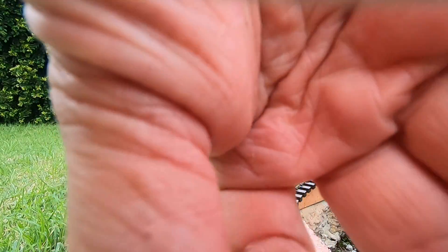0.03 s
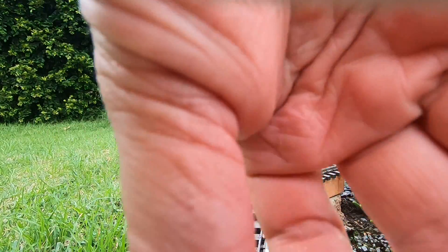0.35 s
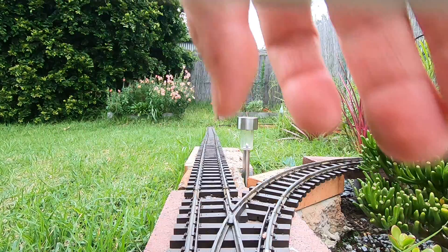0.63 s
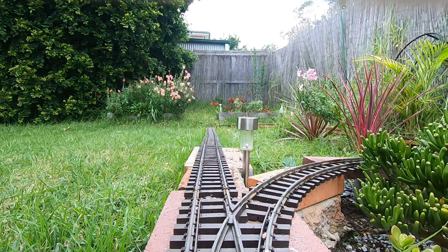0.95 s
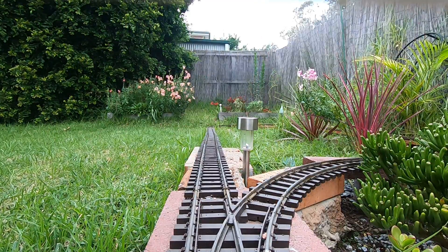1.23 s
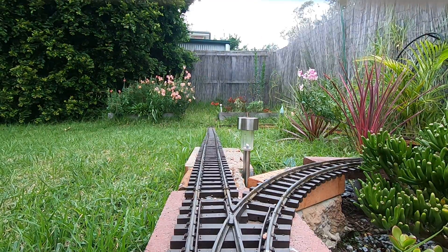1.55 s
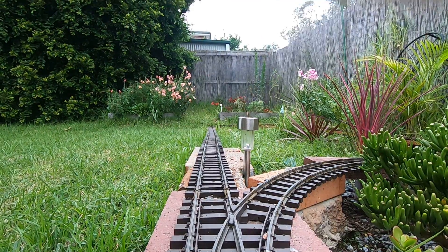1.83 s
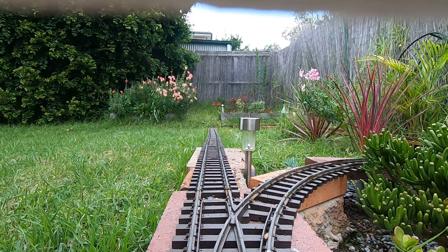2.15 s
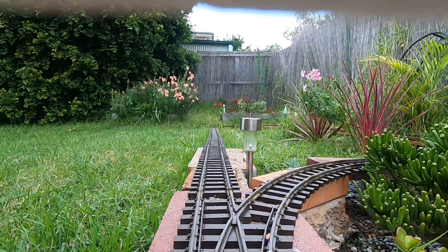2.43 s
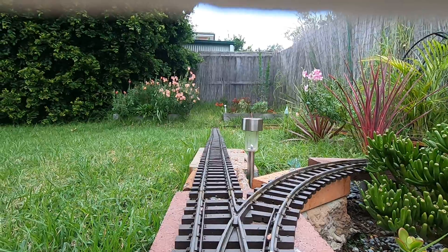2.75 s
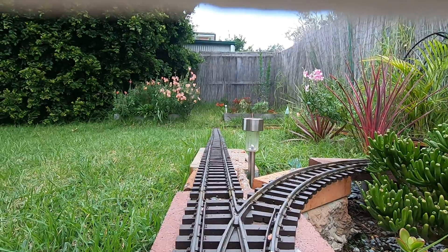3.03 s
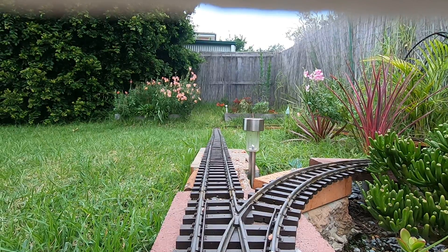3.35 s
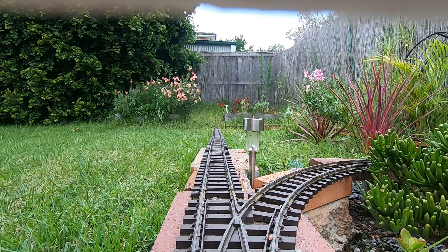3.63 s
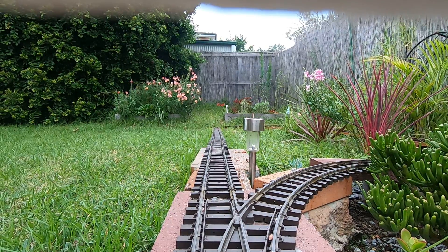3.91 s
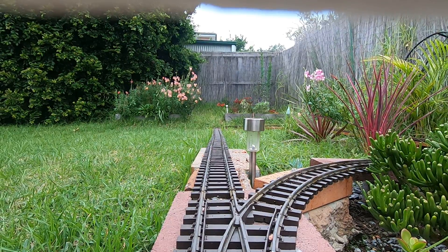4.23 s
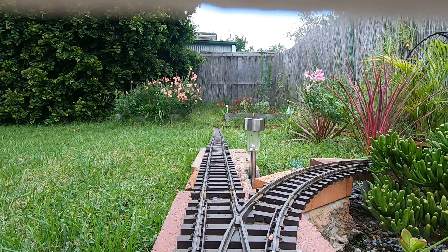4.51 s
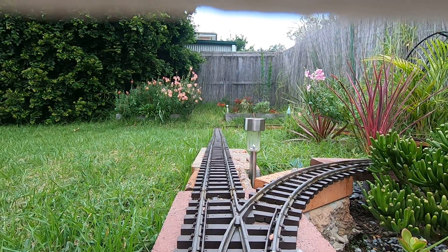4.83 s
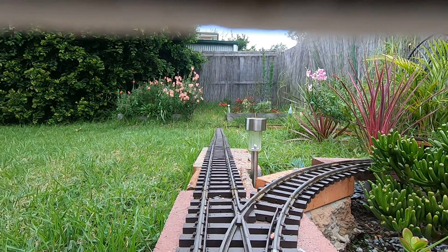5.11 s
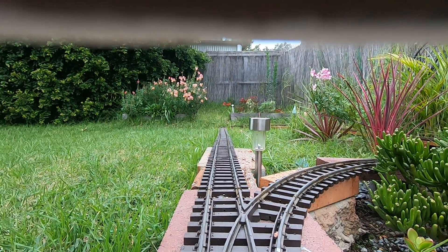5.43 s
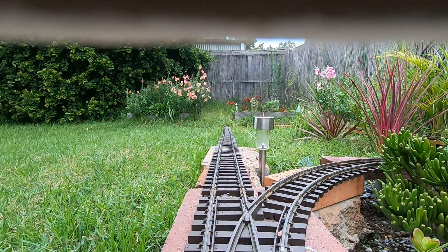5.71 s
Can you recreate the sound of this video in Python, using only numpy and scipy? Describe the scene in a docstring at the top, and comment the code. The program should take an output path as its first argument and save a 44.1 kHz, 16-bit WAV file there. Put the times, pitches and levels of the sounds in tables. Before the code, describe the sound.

A hand brushes and thumps a microphone, then fingers rub and tap a small camera while birds chirp in a quiet garden.

```python
"""A small camera is handled in a quiet garden, over a faint outdoor hush. First a palm lets go, brushing
the microphone ports and thumping the air pocket over the right one (0-0.5 s). Small birds chirp (1-4 s).
A fingertip slides along the case (1.6-2.5 s), fingers tap it (3.3-3.7 s) and graze it, then rub and tap
into a new grip (4.4-6 s). The case carries these finger sounds to both microphones alike."""
import sys
import numpy as np
from scipy import signal
from scipy.fft import rfft, irfft, next_fast_len
from scipy.io import wavfile

SR = 44100
rng = np.random.default_rng(int(sys.argv[2]) if len(sys.argv) > 2 else 0)


def output_pcm(signal):
    """Save a mono or channel-first signal as 16-bit PCM at the path in sys.argv[1].

    Samples are clipped to [-1, 1] before scaling.
    """
    pcm = np.clip(np.atleast_2d(signal).T, -1, 1) * 32767
    wavfile.write(sys.argv[1], SR, np.round(pcm).astype(np.int16))


N = 263277
TIME = np.arange(N) / SR

# palm strokes over the ports: (start [s], length [s], level [dB])
PALM_STROKES = [(0, 0.031, -31.5), (.025, .085, -41), (.05, 0.0059, -41.5), (.111, 0.033, -28.5),
                (.14, 0.046, -42.5), (.181, 0.037, -21.5), (.193, 0.019, -17), (.309, .03, -42),
                (.33, 0.063, -53), (.396, 0.018, -41), (.415, 0.048, -51.5)]
PALM_ATTACK_S, PALM_RELEASE_S = 0.0039, 0.018
# hand resting on the case: (start [s], length [s], skin creep [dB], body sway [dB])
HAND_RESTS = [(1.609, 0.15, -57, -54), (1.804, .66, -52, -43.5), (4.42, 0.14, -58, -43),
              (4.597, .88, -48.5, -43), (5.491, 0.303, -53, -48.5), (5.817, 0.14, -47, -45)]
# spectrum of the gripped case: (frequency [Hz], gain [dB])
GRIP_SPECTRUM = [(150, -77), (250, -18), (499, -1), (583, -2.5), (669, -3.5), (1920, -6.5), (2660, -8.5),
                 (11200, -40), (13700, -43.5), (15500, -46)]
# resonances of the gripped case: (frequency [Hz], width [Hz], lift [dB])
GRIP_RESONANCES = [(488, 31, 5.8), (712, 53, 2.9), (795, 140, 4.1), (950, 32, 1.1), (1219, 42, 8.6),
                   (1420, 240, 4.2), (2370, 120, 1.8), (2650, 64, 7.8), (2990, 300, 1.4), (3380, 66, 4.3)]


def from_db(db):
    return 10 ** (np.asarray(db) / 20)


def unit_rms(x):
    return x / np.sqrt(np.mean(x ** 2) + 1e-20)


def add(out, start_s, sound):
    start = max(round(start_s * SR), 0)
    out[start:start + len(sound)] += sound[:max(N - start, 0)]


def band(x, low_hz, high_hz, order=4):
    sos = signal.butter(order, [low_hz, min(high_hz, 0.45 * SR)], "band", fs=SR, output="sos")
    return signal.sosfilt(sos, x)


def coloured(x, spectrum):
    """Minimum-phase filter from (frequency [Hz], gain [dB]) points."""
    size = 2 * next_fast_len(len(x) // 2 + 4096)
    hz, db = np.transpose(spectrum)
    gain_db = np.interp(np.log(np.fft.rfftfreq(size, 1 / SR) + 1), np.log(hz), db)
    cepstrum = irfft(np.log(from_db(gain_db)))
    cepstrum[1:size // 2] *= 2
    cepstrum[size // 2 + 1:] = 0
    return irfft(rfft(x, size) * np.exp(rfft(cepstrum)))[:len(x)]


def lifted(x, resonances):
    """One peaking filter per resonance."""
    for hz, width_hz, lift_db in resonances:
        x = x + (from_db(lift_db) - 1) * signal.lfilter(*signal.iirpeak(hz, hz / width_hz, SR), x)
    return x


def ring(push, hz, t60_s):
    """Damped mode; a unit click rings a sine of height 1."""
    r, w = from_db(-60 / (t60_s * SR)), 2 * np.pi * hz / SR
    return signal.lfilter([0, np.sin(w)], [1, -2 * r * np.cos(w), r * r], push + 1e-18)


def drift(rate_hz):
    """Slow random curve, unit RMS."""
    knots = rng.standard_normal(4096)
    return unit_rms(np.interp(TIME * rate_hz, np.arange(len(knots)), knots))


def swell(t, length_s, attack_s, release_s):
    """Stroke envelope: rise, hold, fall; brisker in short strokes."""
    rise_s, fall_s = min(attack_s, length_s / 3), min(release_s, length_s / 2)
    ramp = np.clip(np.minimum(t / rise_s, (length_s - t) / fall_s), 0, 1)
    return np.sin(np.pi / 2 * ramp) ** 1.42


def strokes(rows, attack_s, release_s):
    """Summed envelope of (start [s], length [s], level [dB]) strokes."""
    return sum(from_db(db) * swell(TIME - start_s, length_s, attack_s, release_s)
               for start_s, length_s, db in rows)


def friction(rate_hz, spread_db, judder_db):
    """Skin ridges catch and slip: dense, uneven clicks in small surges."""
    slips = rng.random(N) < rate_hz / SR
    sizes = from_db(spread_db * np.minimum(rng.exponential(1, N), 3)) * rng.choice([-1, 1], N)
    return unit_rms(slips * sizes * from_db(judder_db * drift(170)))


def garden(hush_gain_db=1.0, rumble_gain_db=3.0, bass_db=-80.0):
    """Faint outdoor hush, distant rumble and a steady faint bass."""
    # preset levels, one list per lull in the handling: (time [s], hush [dB], rumble [dB])
    # hush dip at 2.5 s: the recorder's automatic gain ducks it after loud handling, then recovers
    lulls = [
        [(0.48, -59.5, -87.5), (0.734, -65, -76), (0.982, -66, -71), (1.196, -65, -64.5), (1.434, -63.5, -74),
         (1.58, -62, -74.5)],
        [(2.5, -71.5, -74), (2.732, -73.5, -69.5), (2.964, -67, -64), (3.658, -68, -72.5), (3.996, -67, -61.5),
         (4.4, -70.5, -68.5)],
    ]
    # hush: (frequency [Hz], gain [dB])
    hush_spectrum = [(180, -33), (300, -4), (371, -24), (523, -10.5), (597, -6.5), (898, -6), (2600, -8.5),
                     (3020, -17), (15000, -62)]
    # rumble: (frequency [Hz], gain [dB])
    rumble_spectrum = [(15, -40.5), (25, -5), (54, 2), (86, -25.5), (157, 6.5), (215, 5), (302, -6),
                       (450, -7.5), (580, -29.5), (990, -120)]
    times_s, hush_db, rumble_db = np.vstack(lulls).T
    hush = unit_rms(coloured(rng.standard_normal(N), hush_spectrum))
    rumble = unit_rms(coloured(rng.standard_normal(N), rumble_spectrum))
    bass = from_db(bass_db) * unit_rms(band(rng.standard_normal(N), 25, 110, order=2))
    hush *= from_db(hush_gain_db + np.interp(TIME, times_s, hush_db) + drift(11))
    rumble *= from_db(rumble_gain_db + np.interp(TIME, times_s, rumble_db) + 1.8 * drift(16))
    return hush + rumble + bass


def birds(note_s=0.05, glide_s=0.0104, waver=0.014, echo_db=-16.0, echo_slope=0.74, echo_t60_s=0.42):
    """Near-pure notes glide onto pitch; fence and trees scatter a tail, fuller for distant notes."""
    # bird notes: (time [s], final pitch [Hz], start/final pitch [ratio], level [dB])
    chirps = [(.992, 2282, 1.03, -51), (1.134, 3190, 0.87, -63.5), (1.181, 3160, 0.77, -55.5),
              (1.225, 2267, 0.98, -60), (1.238, 3230, 0.71, -61.5), (1.499, 3090, 0.65, -59),
              (1.557, 3350, 0.41, -63), (2.505, 2800, 1, -64), (2.59, 4392, .9, -76),
              (2.63, 3116, 1.13, -63), (2.63, 6150, 1.03, -81), (3.584, 2364, 1.14, -43),
              (3.79, 2910, 0.89, -36), (3.966, 2286, 0.95, -55.5)]
    direct, echo_send, t = np.zeros(N), np.zeros(N), TIME[:SR // 2]
    for start_s, final_hz, start_ratio, level_db in chirps:
        hz = final_hz * (1 + (start_ratio - 1) * np.exp(-t / glide_s))
        hz *= 1 + waver * drift(210)[:len(t)]
        phase = 2 * np.pi * np.cumsum(hz) / SR
        note = np.sin(phase) + from_db(-38.5) * np.sin(2 * phase) + from_db(-42.5) * np.sin(3 * phase)
        note *= np.sin(np.pi * np.minimum(t / note_s, 1))
        add(direct, start_s, from_db(level_db) * note)
        add(echo_send, start_s, from_db(echo_db + echo_slope * level_db) * note)
    scatter = rng.standard_normal(len(t)) * from_db(-60 * t / echo_t60_s) * (t > 0.015)
    return direct + signal.fftconvolve(echo_send, scatter / np.linalg.norm(scatter))[:N]


def skin_ticks(decay_s=0.011):
    """Grazing skin lets go of the case in tiny bright crackles."""
    # fingertip grazes: (start [s], length [s], level [dB])
    grazes = [(4.11, 0.305, -63.5), (5.09, 0.12, -51)]
    # single ticks: (time [s], peak [dB])
    ticks = [(3.41, -67), (3.501, -57.5), (4.097, -53), (4.194, -46), (4.22, -51), (4.317, -47)]
    # crackle: (frequency [Hz], gain [dB])
    spectrum = [(1500, -13.5), (3300, 1), (4800, -18.5), (7600, -11.5), (11000, -26), (15000, -29)]
    slips = friction(1300, spread_db=1.3, judder_db=3.2)
    out = strokes(grazes, attack_s=0.059, release_s=0.17) * unit_rms(coloured(slips, spectrum))
    t = TIME[:SR // 20]
    for start_s, peak_db in ticks:
        crackle = coloured(rng.standard_normal(len(t)) * np.exp(-t / decay_s), spectrum)
        add(out, start_s, from_db(peak_db) * crackle / np.abs(crackle).max())
    return out


def skin_creep():
    """Resting skin creeps faintly on the case between strokes."""
    rows = [(start_s, length_s, db) for start_s, length_s, db, _ in HAND_RESTS]
    contact = strokes(rows, attack_s=0.0083, release_s=0.024)
    slips = friction(2500, spread_db=0.7, judder_db=4.2)
    return contact * unit_rms(lifted(coloured(slips, GRIP_SPECTRUM), GRIP_RESONANCES))


def body_sway(settle_db_per_s=75):
    """The resting hand shakes the body in low lumps that settle on release."""
    rows = [(start_s, length_s, db) for start_s, length_s, _, db in HAND_RESTS]
    weight = strokes(rows, attack_s=0.12, release_s=0.13)
    # shaking body: (frequency [Hz], gain [dB])
    spectrum = [(22, -1), (65, 0), (180, 1.5), (300, -11.5), (430, -24), (730, -68)]
    settling = from_db(-settle_db_per_s * TIME)
    envelope = np.maximum.accumulate(weight / settling) * settling   # limits the rate of fall
    return envelope * unit_rms(coloured(friction(900, spread_db=3.7, judder_db=4.5), spectrum))


def scrape(rows, slips, spectrum, resonances, attack_s, release_s,
           hiss_db, hiss_slope, hollow_q, hollow_lift_db):
    """Friction rings a finger-tuned hollow and the shell, damped anew per stroke; hiss follows rasp."""
    case = lifted(coloured(slips, spectrum), resonances)
    mids = band(case, 255, 1448)
    rasp = unit_rms(band(case, 1696, 4120))
    hiss = unit_rms(band(case, 4780, 21800))
    mean_rasp_db = np.mean([row[2] for row in rows])
    out = np.zeros(N)
    for start_s, length_s, rasp_db, hollow_db, hollow_hz in rows:
        span = slice(round(start_s * SR), round((start_s + length_s) * SR))
        hollow = unit_rms(lifted(mids[span], [(hollow_hz, hollow_hz / hollow_q, hollow_lift_db)]))
        damping = [(hz, width_hz, rng.normal(0, 4.5)) for hz, width_hz, _ in resonances]
        shell = unit_rms(lifted(rasp[span], damping))
        hiss_gain = from_db(hiss_db + hiss_slope * (rasp_db - mean_rasp_db))
        sound = from_db(rasp_db) * shell + from_db(hollow_db) * hollow + hiss_gain * hiss[span]
        add(out, start_s, swell(TIME[span] - start_s, length_s, attack_s, release_s) * sound)
    return out


def finger_slides(hollow_hz=485, hollow_db=-41.0, hollow_slope=0.23):
    """A light fingertip keeps one hollow, which grows less with speed than the rasp does."""
    # slides along the case: (start [s], length [s], rasp [dB])
    slides = [(1.623, 0.1, -26.5), (1.822, 0.2, -39.5), (1.851, 0.024, -39), (1.927, 0.097, -31.5),
              (1.969, 0.2, -43.5), (2.15, 0.11, -39), (2.232, 0.12, -61), (2.307, 0.039, -34.5),
              (2.342, 0.032, -25.5), (2.368, 0.036, -42), (2.419, 0.029, -49)]
    # lightly touched case: (frequency [Hz], gain [dB])
    spectrum = [(150, -64.5), (250, -0.5), (474, -0.5), (681, -10), (781, -6), (3010, 6), (4550, -12.5),
                (5130, -19), (12400, -31.5), (15500, -45.5)]
    # its resonances: (frequency [Hz], width [Hz], lift [dB])
    resonances = [(483, 60, 8.7), (1154, 88, 4.3), (1878, 150, 5.8), (2910, 130, 6.1), (3246, 50, 5.9),
                  (3560, 14, 9.3), (4425, 240, 9.1), (8000, 680, 6.9)]
    mean_db = np.mean([db for _, _, db in slides])
    rows = [(start_s, length_s, db, hollow_db + hollow_slope * (db - mean_db), hollow_hz)
            for start_s, length_s, db in slides]
    slips = friction(7000, spread_db=2.35, judder_db=1.06)
    return scrape(rows, slips, spectrum, resonances, attack_s=0.029, release_s=0.05,
                  hiss_db=-47.5, hiss_slope=0.63, hollow_q=16.5, hollow_lift_db=2.0)


def finger_grips():
    """Pressed pads rub, each over its own hollow; the top treble fades as the grip closes."""
    # rubs: (start [s], length [s], shell rasp [dB], hollow [dB], hollow pitch [Hz])
    rubs = [(4.44, 0.08, -36.5, -45, 550), (4.495, 0.1, -44.5, -45.5, 554), (4.61, 0.048, -41.5, -40, 563),
            (4.648, 0.12, -33, -40, 900), (4.738, 0.087, -35, -31.5, 886), (4.84, 0.081, -40, -32, 477),
            (4.898, 0.075, -30.5, -24.5, 636), (5.033, 0.085, -33.5, -22, 796),
            (5.098, 0.041, -33.5, -29.5, 1080), (5.128, 0.099, -52, -42.5, 980),
            (5.2, 0.056, -33.5, -38, 1070), (5.289, 0.069, -53, -40.5, 960),
            (5.381, 0.074, -28.5, -34.5, 930), (5.503, 0.048, -29, -39, 860),
            (5.533, 0.083, -46.5, -41, 870), (5.655, .06, -48, -51, 960), (5.706, 0.079, -45.5, -42, 880),
            (5.825, 0.089, -44.5, -42.5, 950)]
    # top treble: (time [s], gain [dB])
    treble_curve = [(4.45, 2.5), (4.8, 13), (4.9, -2), (5.4, -33), (5.6, -43)]
    slips = friction(5000, spread_db=0.83, judder_db=1.72)
    rub = scrape(rubs, slips, GRIP_SPECTRUM, GRIP_RESONANCES, attack_s=0.049, release_s=0.035,
                 hiss_db=-53.5, hiss_slope=0.99, hollow_q=3.6, hollow_lift_db=8.0)
    treble = signal.lfilter(*signal.iirpeak(13500, 3.0, SR), rub)
    treble_gain = from_db(np.interp(TIME, *np.transpose(treble_curve)))
    return rub + (treble_gain - 1) * treble


def finger_taps(touch_s=0.0053, scuff_s=0.0063, tail_s=0.04, shell_db=-25.5, shell_slope=0.32):
    """Skin touches, then lands with a click and scuff; force rings the hollow more than the shell."""
    # taps and slips: (time [s], hollow peak [dB], hollow pitch [Hz])
    taps = [(2.3503, -26, 1300), (3.3358, -21, 945), (3.5943, -41, 1620), (3.647, -20.5, 1040),
            (3.671, -23.5, 1090), (4.445, -25, 603), (4.910, -24.5, 724), (5.089, -16.5, 690),
            (5.111, -19.5, 990), (5.138, -24.5, 1000), (5.223, -17.5, 1010), (5.257, -15.5, 1150),
            (5.3, -22, 1080), (5.373, -19, 1020), (5.961, -24, 330)]
    # shell modes: (frequency [Hz], gain [dB], t60 [s])
    shell_modes = [(240, -10.5, 0.06), (442, -13, 0.022), (1474, -9, 0.056), (1770, -15, 0.016),
                   (2580, -89, 0.0024), (2800, 10, 0.0021), (3900, -56, 0.0012), (8030, -19, 0.0065)]
    lead = SR // 50
    out, t = np.zeros(N), np.arange(-lead, SR // 6) / SR   # landing at t = 0
    click = from_db(-2.5) * (t == 0)
    touch = from_db(-29.5) * np.exp(-abs(t) / touch_s)
    scuff = from_db(-13.5) * np.exp(-abs(t) / scuff_s) + from_db(-35) * np.exp(-abs(t) / tail_s)
    envelope = np.where(t < 0, touch, scuff)
    for landing_s, peak_db, hollow_hz in taps:
        push = band(click + envelope * rng.standard_normal(len(t)), 150, 4600, order=1)   # padded tip
        shell = sum(from_db(db + rng.normal(0, 3)) * ring(push, hz, t60_s)
                    for hz, db, t60_s in shell_modes)
        hollow = ring(push, hollow_hz, t60_s=0.012)
        tap = from_db(peak_db) * hollow - from_db(shell_db + shell_slope * peak_db) * shell
        add(out, landing_s + t[0], tap / np.abs(hollow).max())
    return out


def palm_rumble(left_db=-8.5, right_db=-8.0, body_db=-7.5):
    """The moving palm pumps low lumps of air into each port and shakes the body that holds both."""
    slips = [friction(900, spread_db=3.0, judder_db=0.86) for _ in range(3)]
    left, right, body = [unit_rms(band(x, 45, 170, order=2)) for x in slips]
    lumps = from_db([[left_db], [right_db]]) * (np.array([left, right]) + from_db(body_db) * body)
    return strokes(PALM_STROKES, PALM_ATTACK_S, PALM_RELEASE_S) * lumps


def palm_brush(left_db=-4.0, right_db=1.0):
    """Skin brushes each port separately, the right one more brightly."""
    # left port: (frequency [Hz], gain [dB])
    left_spectrum = [(600, -20.5), (850, -5), (1250, 5), (1700, -2), (2900, -6), (3500, -14.5),
                     (7600, -26.5), (15000, -46.5)]
    # right port: (frequency [Hz], gain [dB])
    right_spectrum = [(200, -1), (600, -2), (820, -15.5), (1250, -2.5), (1700, -6.5), (2800, -7.5),
                      (3400, -19.5), (5200, -15.5), (7600, -14.5), (10000, -20.5), (11500, -34.5),
                      (15500, -45.5)]
    left = unit_rms(coloured(friction(5000, spread_db=1.8, judder_db=3.3), left_spectrum))
    right = unit_rms(coloured(friction(4000, spread_db=6.2, judder_db=0.9), right_spectrum))
    ports = np.array([from_db(left_db) * left, from_db(right_db) * right])
    return strokes(PALM_STROKES, PALM_ATTACK_S, PALM_RELEASE_S) * ports


def palm_thumps(leak_db=-15.0, leak_spread=0.33):
    """Soft pushes ring the air pocket over the right port; its modes leak unevenly to the left."""
    # skin sealing and freeing the port: (time [s], level [dB], push length [s])
    pushes = [(0.032, -17.5, 0.0007), (0.081, -21, .0039), (0.0861, -2, 0.0019), (.144, -6.5, 0.0037),
              (0.16, -11, 0.0034), (0.188, -4, 0.0024), (.2015, -0.5, 0.0025), (0.205, -4.5, 0.0036),
              (.2196, -6.5, 0.003), (.335, -16, 0.0033), (.406, -20, 0.0019)]
    # air under the palm: (frequency [Hz], gain [dB], t60 [s])
    pocket_modes = [(68.5, -24, 0.17), (143.3, -10, .06), (205, -10.5, 0.1), (323, 5, 0.054),
                    (480, 2.5, .025)]
    left, right, t = np.zeros(N), np.zeros(N), TIME[:SR // 5]
    for start_s, level_db, push_s in pushes:
        push = np.sin(np.pi * np.minimum(t / push_s, 1)) ** 2
        modes = np.array([from_db(db) * ring(push, hz, t60_s) for hz, db, t60_s in pocket_modes])
        modes *= from_db(level_db) / np.abs(modes.sum(axis=0)).max()
        leak = from_db(leak_db) * (leak_spread * rng.standard_normal(len(modes)) - 1)   # antiphase
        add(right, start_s, modes.sum(axis=0))
        add(left, start_s, leak @ modes)
    return band(np.array([left, right]), 73, 2500, order=1)


def scene():
    """Palm in stereo, all else centred."""
    palm = palm_brush() + palm_rumble() + palm_thumps()
    case = finger_slides() + finger_grips() + skin_creep() + body_sway() + finger_taps() + skin_ticks()
    return palm + case + birds() + garden()


def record(dry, clip_level=0.9, cutoff_hz=15600):
    """Peak clipping, then a steep low-pass."""
    lowpass = signal.ellip(10, 0.2, 80, cutoff_hz, fs=SR, output="sos")
    return signal.sosfilt(lowpass, np.clip(dry, -clip_level, clip_level))


dry = scene()
out = record(dry)
output_pcm(out)
```